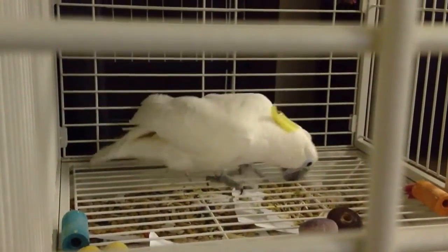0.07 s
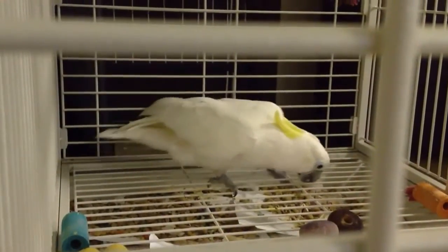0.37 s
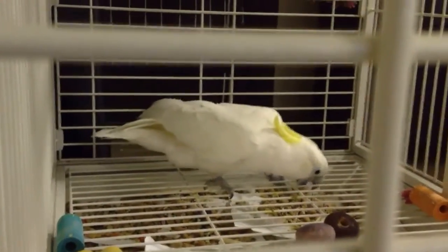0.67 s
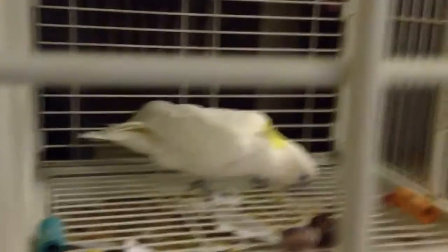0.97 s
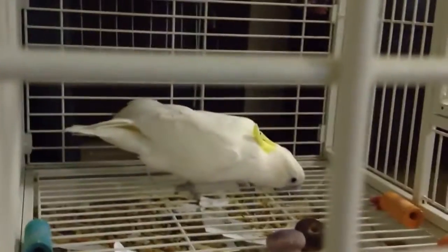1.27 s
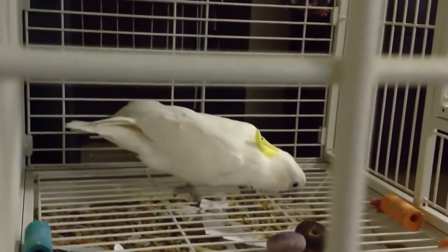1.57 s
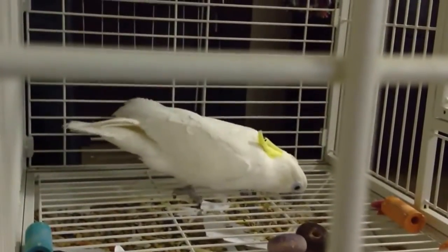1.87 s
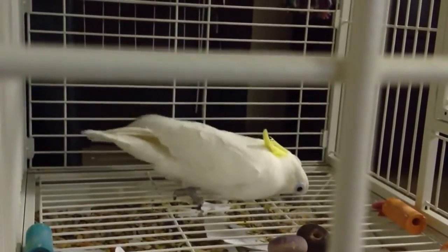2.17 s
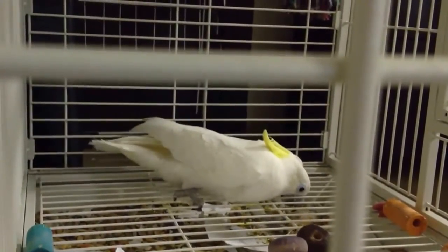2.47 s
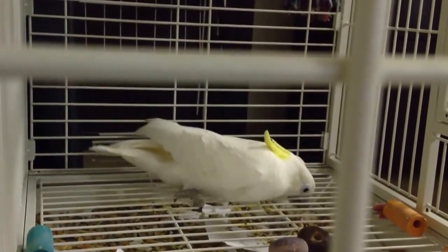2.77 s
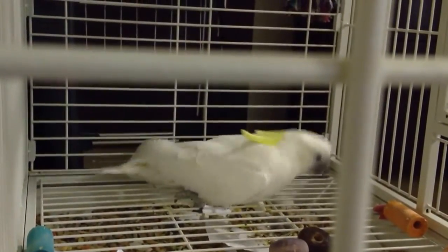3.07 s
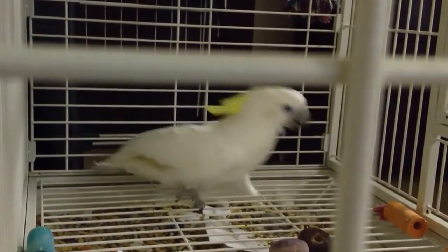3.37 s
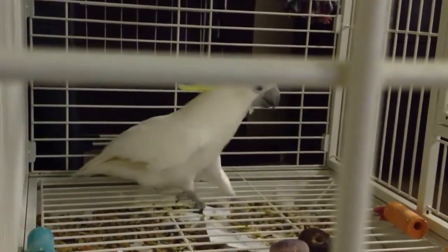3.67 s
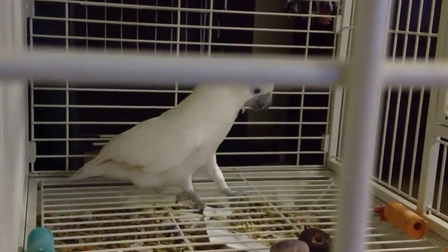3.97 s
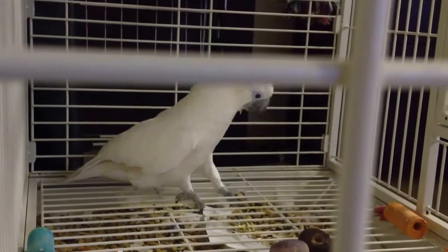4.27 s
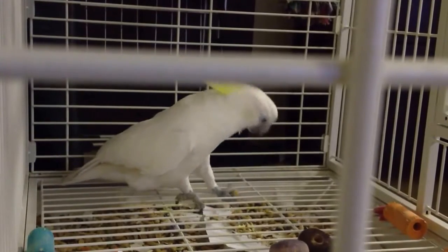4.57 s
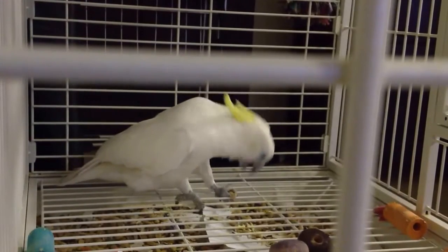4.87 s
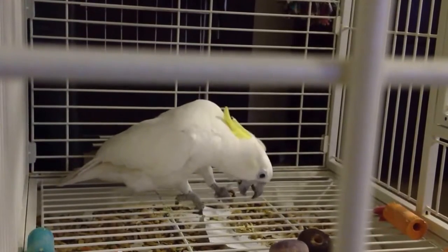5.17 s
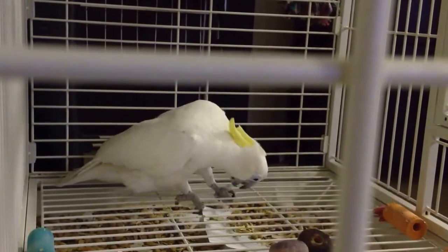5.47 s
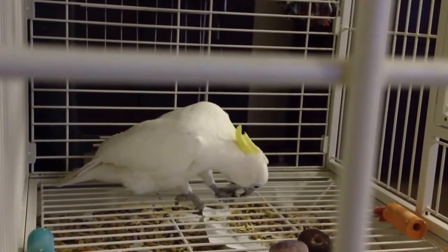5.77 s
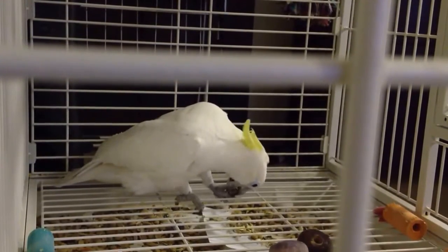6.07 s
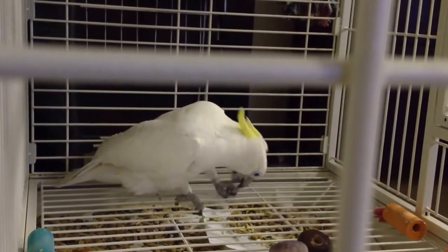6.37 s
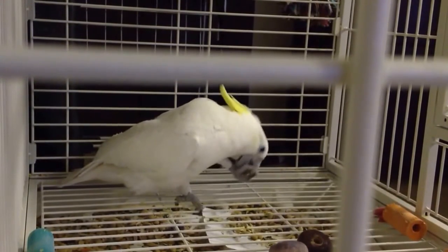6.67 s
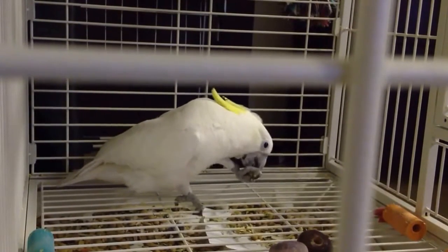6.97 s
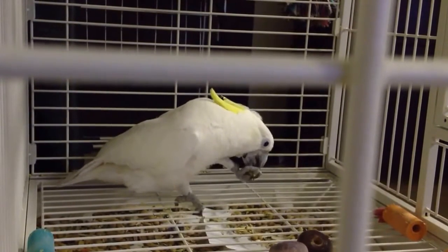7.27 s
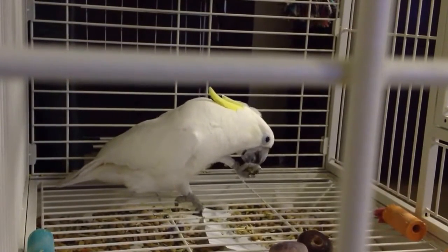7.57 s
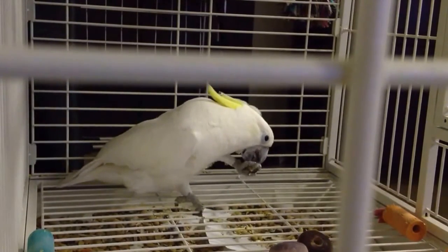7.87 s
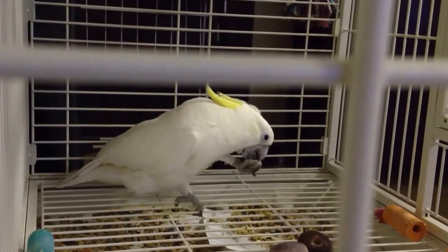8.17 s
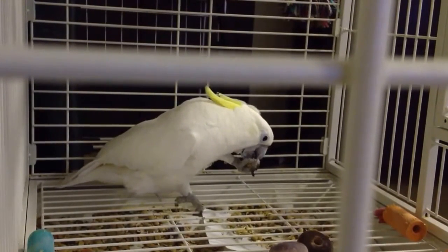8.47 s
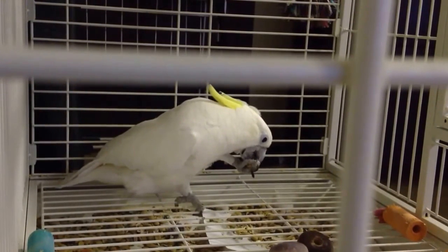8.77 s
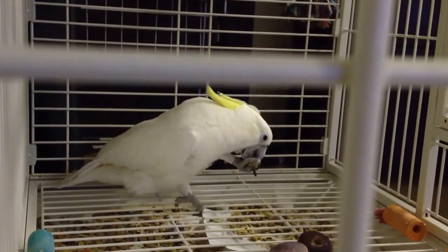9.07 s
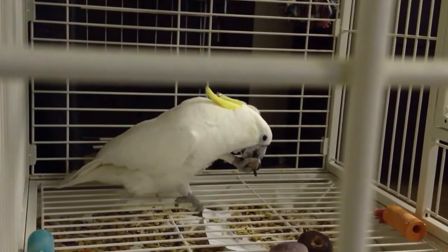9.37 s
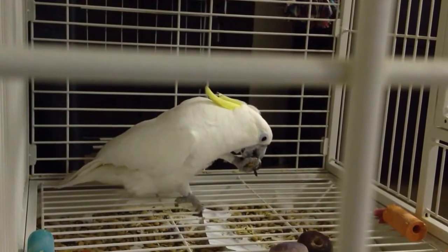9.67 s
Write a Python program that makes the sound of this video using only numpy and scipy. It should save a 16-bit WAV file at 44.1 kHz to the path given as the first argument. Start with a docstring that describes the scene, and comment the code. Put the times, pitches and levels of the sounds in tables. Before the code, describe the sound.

Scratching, tapping and a ringing metal clang as a parrot moves in its cage, followed by quiet nibbling clicks over room hum.

```python
"""Over a low room hum, a cockatoo's beak and claws scuff the wire floor of its cage.
Stick-slip friction scratches the grate; impacts set its wires ringing and knock the tray below.
The bird rears up with a swish of feathers, then cracks a morsel in sparse, dry clicks of brittle
fracture. A small, quiet room reflects these sounds; a faint, thin whistle comes and goes in it."""
import sys
import numpy as np
from scipy import signal
from scipy.fft import rfft, irfft, next_fast_len
from scipy.io import wavfile
from scipy.ndimage import uniform_filter1d

SR = 44100
rng = np.random.default_rng(int(sys.argv[2]) if len(sys.argv) > 2 else 0)


def transcribe(signal):
    """Save signal, clipped to [-1, 1], as a 16-bit WAV file at the path in sys.argv[1]."""
    frames = np.atleast_2d(signal).T
    limited = np.clip(frames, -1, 1)
    pcm = np.round(limited * 32767).astype(np.int16)
    wavfile.write(sys.argv[1], SR, pcm)


N = 432621
TIME = np.arange(N) / SR


def amp(db):
    """Amplitude ratio: tenfold for every 20 dB."""
    return 10 ** (np.asarray(db) / 20)


def unit_rms(x):
    """Power normalisation to an rms of 1."""
    return x / np.sqrt(np.mean(x ** 2) + 1e-30)


def unit_energy(x, ms):
    """Energy normalisation: a transient gets the energy of an rms of 1 lasting ms milliseconds."""
    return x * np.sqrt(ms * SR / 1000 / (np.sum(x ** 2) + 1e-30))


def curve(points, hz):
    """Interpolation of (f/Hz, value) points on a logarithmic frequency axis."""
    f, value = np.transpose(points)
    return np.interp(np.log(hz + 1), np.log(f + 1), value)


def add(mix, s, sound):
    """Superposition: a sound joins the mix at time s, which may be negative."""
    first = round(s * SR)
    sound = sound[..., max(-first, 0):]
    part = mix[..., max(first, 0):][..., :sound.shape[-1]]
    part += sound[..., :part.shape[-1]]


def colour(x, db_of, size=2048):
    """Minimum-phase filter: the phase follows from the log gain by the Hilbert transform."""
    hz = abs(np.fft.fftfreq(size, 1 / SR))
    log_gain = np.log(amp(np.maximum(db_of(hz), -90)))
    response = np.fft.ifft(np.exp(np.conj(signal.hilbert(log_gain)))).real[:size // 2]
    return signal.fftconvolve(x, response)[:len(x)]


def hump(hz, centre_hz, octaves, skirt_db=9):
    """Broad resonance, in dB: round on top, with straight skirts."""
    away = np.log2((hz + 1) / centre_hz) / octaves
    return -skirt_db * (np.sqrt(1 + away ** 2) - 1)


def peak(hz, centre_hz, width_hz):
    """Narrow resonance, in dB: Lorentzian amplitude of half-width width_hz."""
    return -20 * np.log10(1 + ((hz - centre_hz) / width_hz) ** 2)


def noise(db_of):
    """Stationary Gaussian noise of rms 1 with the given spectrum."""
    size = next_fast_len(N)
    spectrum = rfft(rng.standard_normal(size)) * amp(db_of(np.fft.rfftfreq(size, 1 / SR)))
    return unit_rms(irfft(spectrum, size)[:N])


def band(centre_hz, width_hz):
    """Narrow-band noise: a wavering tone, or a slow random drift when centred on 0 Hz."""
    return noise(lambda f: peak(f, centre_hz, width_hz))


def ringing(modes, hz, size):
    """Free vibration: damped modes at ratios to hz, over size samples, with an rms of 1."""
    t = np.arange(size) / SR
    return unit_rms(sum(amp(db - 60 * t / t60) * np.sin(2 * np.pi * hz * ratio * t)
                        for ratio, db, t60 in modes))


# spectrum of the room air: f/Hz, relative density/dB
AIR_SPECTRUM = [(15, -59), (25, -52), (43, -25.5), (75, -21.5), (104, -3.5), (126, -0.5), (152, -12),
                (183, -0.5), (240, -8), (297, -6), (495, -13.5), (762, -16), (1950, -25.5), (13500, -38),
                (15500, -33)]
# its slow drift: t/s, level/dB
AIR_LEVEL = [(0, -56), (1.5, -57), (3.5, -55), (5.6, -58), (9.8, -58.5)]
# drones in the room: f/Hz, half-width/Hz, level/dB
DRONES = [(110.5, 22, -70.5), (134.2, 14, -70.5), (182, 6, -65.5), (219, 8.7, -67), (5470, 50, -88.5)]
def room_hum():
    """Ambient noise: narrow-band drones stand on a broad, bass-heavy spectrum."""
    air = noise(lambda f: curve(AIR_SPECTRUM, f)) * amp(np.interp(TIME, *np.transpose(AIR_LEVEL)))
    return air + sum(amp(db) * band(hz, width_hz) for hz, width_hz, db in DRONES)


# course of a faint low tone: t/s, f/Hz, level/dB
TONE_GLIDE = [(0.6, 284, -68), (0.85, 289.3, -64.5), (1.15, 299, -63.5), (1.5, 289.3, -63.5),
              (1.801, 300.8, -60), (2.05, 313, -53), (2.26, 326, -59), (2.419, 307, -63), (2.9, 317.3, -66),
              (3.15, 313, -60), (3.58, 320, -85), (3.7, 310, -91)]
def low_tone(waver_rate_hz=6.2, waver_hz=2.29, waver_db=2.5):
    """Random frequency and amplitude modulation: a tone wavers as it climbs and sinks back."""
    s, hz, db = np.transpose(TONE_GLIDE)
    pitch_hz = np.interp(TIME, s, hz) + waver_hz * band(0, waver_rate_hz)
    level_db = np.interp(TIME, s, db) + waver_db * band(0, waver_rate_hz)
    return unit_rms(np.sin(2 * np.pi * np.cumsum(pitch_hz) / SR)) * amp(level_db)


def slips(size, per_s=3000, spread_db=1.0, rub=0.68):
    """Stick-slip friction: many tiny catches of uneven strength over a smooth rub."""
    strengths = amp(spread_db * np.minimum(rng.exponential(1, size), 3.5)) * rng.choice([-1, 1], size)
    catches = unit_rms(strengths * (rng.random(size) < per_s / SR))
    return unit_rms(catches + rub * rng.standard_normal(size))


def stroke(length_s, lead_s, rise_share=.44, spot_db=2.5):
    """Sliding contact under a pressure that peaks at lead_s: returns (pressure, slips)."""
    t = np.arange(SR // 2) / SR - lead_s
    pressure = np.exp(-np.maximum(-t / rise_share, t / (1 - rise_share)) / length_s)
    spectra = signal.stft(slips(len(t)), nperseg=256)[2]
    # each spot along the way favours its own resonances
    spots = uniform_filter1d(rng.standard_normal(spectra.shape), size=4, axis=0)
    spots = unit_rms(uniform_filter1d(spots, size=6, axis=1))
    return pressure, signal.istft(spectra * amp(spot_db * spots), nperseg=256)[1][:len(t)]


# response of the rattling tray: f/Hz, relative density/dB
TRAY_SPECTRUM = [(100, -38.5), (260, 0.5), (400, 1.5), (620, -0.5), (800, -3), (920, -1), (1100, 0),
                 (1350, -4), (1750, -5.5), (2200, -10), (3000, -13), (5000, -55.5), (15000, -63)]
# strokes of claw or beak: peak t/s, length/s, scratch level/dB, weight (rattle re scratch)/dB
SCUFF_STROKES = [(0.010, 0.038, -55.5, -4), (0.072, 0.056, -57, 1.5), (0.143, 0.04, -59.5, 7.5),
                 (0.907, 0.03, -43, -1.5), (0.945, 0.081, -46.5, -3.5), (1.041, 0.031, -41, -12),
                 (1.085, 0.077, -49, -7.5), (1.180, 0.03, -57.5, 7.5), (1.308, 0.016, -44.5, -3),
                 (1.463, 0.018, -40.5, 0), (1.541, 0.018, -39.5, -7.5), (1.635, 0.04, -56, -7),
                 (1.735, 0.028, -48.5, 1.5), (1.801, 0.018, -54, 5.5), (1.836, 0.033, -47, -2.5),
                 (1.945, 0.021, -45, -0.5), (2.050, 0.29, -46, -5), (2.212, 0.016, -42.5, -19),
                 (2.235, 0.051, -43.5, 1), (2.288, 0.034, -45, 2), (2.353, 0.044, -47, 1),
                 (2.388, 0.037, -44, 2), (2.416, 0.031, -41, 1), (2.515, 0.075, -44, -0.5),
                 (2.597, 0.04, -49, 7.5), (2.671, 0.073, -58.5, -4), (2.855, 0.052, -55.5, 7.5),
                 (3.110, 0.037, -61, -21), (3.385, 0.14, -51, 5), (3.394, 0.016, -44.5, 0),
                 (3.426, 0.02, -41.5, 4), (3.495, 0.13, -48, 0), (4.040, 0.032, -58, -2),
                 (5.030, 0.015, -48, 2.5)]
def scuffs(strokes, scratch_hz=4594, weight_db_per_octave=18, lead_s=.15):
    """Frictional excitation: the slips of each stroke scratch the wire and shake the tray."""
    out = np.zeros(N)
    for s, length_s, db, weight_db in strokes:
        pressure, catches = stroke(length_s, lead_s)
        hz = scratch_hz * 2 ** (-weight_db / weight_db_per_octave)  # heavier strokes scratch lower
        scratch = unit_rms(colour(catches, lambda f: hump(f, hz, octaves=1.0)))
        rattle = unit_rms(colour(catches, lambda f: curve(TRAY_SPECTRUM, f)))
        add(out, s - lead_s, amp(db) * pressure * (scratch + amp(weight_db) * rattle))
    return out


ZING_HZ, ZING_WIDTH_HZ = 11250, 700  # the grate's brightest cluster of modes
# dense, quickly dying modes of the grate: f/Hz, relative density/dB
GRATE_SPECTRUM = [(300, -34), (1600, -14), (2600, -18), (3500, -10), (4200, -4.5), (6000, -6), (7000, -9),
                  (9700, -7.5), (10700, -0.5), (11400, 5.5), (12300, -14), (13500, -10), (15500, -6)]
# its distinct modes; crossing wires ring in close, beating pairs: f/Hz, relative level/dB, T60/s
GRATE_MODES = [(3901, -15, .3), (4060, -23, .25), (3580, -21, .35), (4581, -16, .2), (4905, -21, .45),
               (5303, -22, .4), (5674, -15, .25), (5970, -12, .22), (6385, -15, .28), (10380, -11, .14),
               (10884, -6, .14), (10938, -5, .14), (11135, -6, .18), (11200, -6, .23), (11432, -3, .17),
               (11484, -6, .17), (11590, -7, .22), (11820, -12, .2), (12274, -15, .2), (12834, -15, .2),
               (14646, -16, .16), (15091, -19, .2)]
# blows on the wires: t/s, level/dB, tilt/(dB per octave), zing/dB, hold (factor on the distinct
# modes' T60 and amplitude), then the struck wire's own note: f/Hz, level/dB, T60/s
WIRE_BLOWS = [(0.046, -46.5, 0, -12, 0.88, 4120, -68, 0.45),
              (0.1520, -39.5, 1.5, -10, 0.59, 4195, -63, 0.95),
              (2.0360, -18, 2, -5.5, 0.93, 4200, -47, 0.7), (2.208, -46, -27, -9, 0.52, 3880, -57, 0.21),
              (3.1722, -41.5, -2.5, -11, 0.74, 3900, -53, 0.19),
              (3.9404, -53.5, -19, -9, 0.77, 3860, -68, 0.18),
              (4.031, -51.5, -11, -9, 0.93, 3940, -70, 0.22), (4.586, -54, -8, -10, 0.56, 3850, -71, .3),
              (4.64, -55.5, -7, -9, 0.8, 3900, -77, 0.37), (4.72, -61, -19, -6, .7, 3940, -75, 0.42)]
def grate_ring(dense_t60=0.23, modes_db=-7, build_s=0.00098, trim_db=-1):
    """Modal decay of a welded grate: dense modes die fast, a few sing on unless a foot damps them."""
    out, t = np.zeros(N), np.arange(SR) / SR
    for s, db, tilt_db, zing_db, hold, *_ in WIRE_BLOWS:
        def coupling_db(f):
            """The point of impact decides how strongly each mode is excited."""
            zing = np.exp(-((f - ZING_HZ) / ZING_WIDTH_HZ) ** 2)
            return tilt_db * np.log2(np.maximum(f, 3800) / 8000) + zing_db * zing
        burst = rng.standard_normal(len(t)) * amp(-60 * t / dense_t60)
        dense = colour(burst, lambda f: curve(GRATE_SPECTRUM, f) + coupling_db(f))
        modes = sum(amp(mode_db + coupling_db(hz) - 60 * t / (t60 * hold))
                    * np.sin(2 * np.pi * (hz * t + rng.random())) for hz, mode_db, t60 in GRATE_MODES)
        ring = (unit_rms(dense) + amp(modes_db) * hold * unit_rms(modes)) * (1 - np.exp(-t / build_s))
        add(out, s, amp(db + trim_db) * unit_energy(ring, ms=20))
    return out


# partials of one struck wire: frequency ratio, relative level/dB, T60 ratio
WIRE_PARTIALS = [(1, 0, 1), (1.0022, -3, 1), (0.991, -5, .6), (1.31, -6, .5), (1.5, 3, .55),
                 (1.977, -4, .6), (2.78, -7, .5)]
def wire_notes(shiver_db=4, shiver_width_hz=130, shiver_t60=0.24):
    """Beats: a struck wire swings in two planes of nearly equal pitch, with a noisy shiver around it."""
    out, t = np.zeros(N), np.arange(SR) / SR
    for s, _, tilt_db, _, _, hz, db, t60 in WIRE_BLOWS:
        phase = rng.random()
        note = sum(amp(mode_db + tilt_db * np.log2(ratio) - 60 * t / (t60 * share))
                   * np.sin(2 * np.pi * (hz * ratio * t + phase))
                   for ratio, mode_db, share in WIRE_PARTIALS)
        shiver = unit_rms(colour(rng.standard_normal(len(t)), lambda f: peak(f, hz, shiver_width_hz)))
        add(out, s, amp(db) * (note + shiver * amp(shiver_db - 60 * t / shiver_t60)))
    return out


# hollow, strongly damped modes of beak and morsel: nominal f/Hz, relative level/dB, T60/s
BEAK_MODES = [(720, 0, 0.0111), (1225, 0, 0.04), (1480, -7.5, 0.013), (2000, 2, 0.019),
              (2500, -1.5, 0.01204), (3030, 0.5, 0.013)]
def click(db, hz, octaves, hollow_db=-11, hollow_limit=0.21, snap_s=0.00042, shell_s=0.00286):
    """Impact radiation: a snap, a shiver of husk or claw and a hollow knock, as (direct, wallward)."""
    t = np.arange(1024) / SR
    envelope = np.exp(-t / snap_s) + amp(-8) * np.exp(-t / shell_s)
    # the time of contact limits the treble above the centre
    rolloff_db = lambda f: 6.0 * np.log2(np.maximum(f / hz, 1))
    burst = envelope * rng.choice([-1., 1.], len(t))
    snap = colour(burst, lambda f: hump(f, hz, octaves) - rolloff_db(f))
    # summed over all directions, the snap is smoother and duller
    impulse = signal.unit_impulse(len(t)) * rng.choice([-1., 1.])
    diffuse = colour(impulse, lambda f: hump(f, hz * 0.92, octaves=1.41) - rolloff_db(f))
    body = sum(amp(mode_db - 60 * t / t60) * np.sin(2 * np.pi * f * rng.uniform(0.724, 1.15) * t)
               for f, mode_db, t60 in BEAK_MODES)
    hollow = amp(hollow_db) * (5000 / hz) ** 1.5  # duller blows knock the hollow modes harder
    knock = min(hollow, hollow_limit) * unit_energy(body, ms=1)
    direct = unit_energy(snap, ms=1) + knock
    wallward = unit_energy(diffuse, ms=1) + amp(7) * knock  # the knock radiates mostly aside
    return amp(db) * np.array([direct, wallward])


def flurry(length_s, db, fade_db, hz, octaves, count):
    """Decaying impulse train: clicks thin out and weaken over length_s, as (direct, wallward)."""
    out = np.zeros((2, SR // 6))
    for age in (np.arange(count) + rng.uniform(.3, 1, count)) / count:
        add(out, length_s * age ** 2, click(db + fade_db * age, hz, octaves))
    return out


def wire_chatter(length_s=0.058, relative_db=-14.5):
    """Intermittent contact: a struck wire buzzes against its neighbour."""
    out = np.zeros((2, N))
    for s, db, _, zing_db, *_ in WIRE_BLOWS:
        buzz = flurry(length_s, db + zing_db + relative_db, fade_db=-14, hz=ZING_HZ, octaves=.3, count=4)
        add(out, s, buzz)
    return out


# hollow, woody ring of a knock: frequency ratio, relative level/dB, T60/s
KNOCK_MODES = [(1, 0, .085), (1.07, -5.5, 0.054), (1.55, -8, 0.063)]
# dull knocks of beak and feet: t/s, level/dB, f/Hz, ring re thud/dB
KNOCK_BLOWS = [(0.1530, -49, 695, -2), (0.7894, -42.5, 470, -14), (0.9038, -40, 497, -20),
               (0.9065, -43, 794, -7), (1.1890, -42.5, 467, -3), (1.308, -45, 1243, 1),
               (1.4575, -43, 1125, 14), (1.4668, -39.5, 1117, 3), (1.5390, -42.5, 1330, -2),
               (1.735, -52, 1250, 1.5), (1.836, -48, 1220, 5), (2.2230, -30.5, 583, -29),
               (2.246, -47, 515, -19), (2.334, -43, 520, -8), (2.351, -46, 557, -10), (2.400, -39, 604, -3),
               (2.412, -41, 1600, -3), (2.429, -43, 580, -8), (3.109, -46.5, 446, -17),
               (3.422, -43, 515, 0), (3.4247, -42.5, 1240, -2), (5.0195, -47, 1410, -14),
               (7.0410, -59, 1410, -7), (9.409, -64, 800, -10)]
def knocks(t60_cycles=9.6, build_s=.001, rattle_db=-3, rattle_t60=0.055):
    """Damped oscillation: a blunt blow gives a thud, a hollow ring and a short rattle of the tray."""
    out, t = np.zeros(N), np.arange(8192) / SR
    for s, db, hz, ring_db in KNOCK_BLOWS:
        envelope = amp(-60 * t * hz / t60_cycles) * (1 - np.exp(-t / build_s))
        thud = unit_rms(np.sin(2 * np.pi * hz * t) * envelope)
        ring = amp(ring_db) * ringing(KNOCK_MODES, hz, size=len(t))
        burst = rng.standard_normal(len(t)) * amp(-60 * t / rattle_t60)
        rattle = amp(rattle_db) * unit_rms(colour(burst, lambda f: hump(f, hz, octaves=0.86)))
        add(out, s, amp(db) * unit_energy(thud + ring + rattle, ms=5))
    return out


# sharp taps on the grate: t/s, level/dB, centre f/Hz, spread/octaves, bounce re tap/dB
GRATE_TAPS = [(0.784, -45, 8460, 0.83, 1), (0.9038, -32, 7200, 0.43, -14), (0.9098, -23, 11300, 0.6, -3.5),
              (1.0346, -31, 6460, 0.23, -10), (1.1503, -37, 9200, 1, -14), (1.3103, -32, 8400, 0.63, -16),
              (1.3475, -47, 8200, 0.34, -11), (1.4571, -35, 4700, 0.23, -2.5),
              (1.5402, -38.5, 5230, 0.6, -3), (1.6700, -40.5, 9350, 1, -19),
              (1.8432, -41.5, 9000, 0.61, -3), (1.976, -41, 9500, .65, -10), (2.338, -43, 7500, 0.44, -14),
              (2.3515, -34, 4360, 0.88, -5), (3.4205, -34, 2870, 0.4, -7), (3.7169, -46, 8950, 0.91, -15),
              (3.9835, -54.5, 12500, 0.8, -8), (4.0214, -43.5, 12000, 0.65, -12),
              (4.1592, -45, 12000, .45, -6), (4.1636, -40, 5660, 0.41, -17), (4.2290, -52, 6500, .8, 2)]
def taps(bounce_s=0.0056):
    """Elastic rebound: beak or claw strikes the grate and bounces once."""
    out = np.zeros((2, N))
    for s, db, hz, octaves, bounce_db in GRATE_TAPS:
        add(out, s, click(db, hz, octaves))
        add(out, s + bounce_s, click(db + bounce_db, hz, octaves))
    return out


def shuffles(from_s=1.5, to_s=3.7, per_s=11, length_s=0.051, db=-63, weight_db=4.5):
    """Light friction at loose intervals: the feet shift while the bird forages."""
    count = round(per_s * (to_s - from_s))
    return scuffs([(from_s + (k + rng.random()) / per_s, length_s, db, weight_db) for k in range(count)])


# swishes as the bird rears up: peak t/s, length/s, level/dB, centre f/Hz, spread/octaves
FEATHER_STROKES = [(3.505, 0.13, -43, 7300, 1.2), (3.524, 0.066, -40.5, 6650, 0.25),
                   (3.6, 0.031, -42.5, 6250, 0.37)]
def feathers(lead_s=0.15):
    """Friction noise: feathers brush the wires, too lightly to shake the tray."""
    out = np.zeros(N)
    for s, length_s, db, hz, octaves in FEATHER_STROKES:
        pressure, catches = stroke(length_s, lead_s)
        swish = unit_rms(colour(catches, lambda f: hump(f, hz, octaves)))
        add(out, s - lead_s, amp(db) * pressure * swish)
    return out


# brief ring of the breaking husk: frequency ratio, relative level/dB, T60/s
HUSK_MODES = [(1, 1, 0.0076), (1.16, -3, .007), (1.8, -14, .006)]
# echoes from the nearest walls: delay t/s, gain/dB
EARLY_ECHOES = [(0.0125, -14.5), (0.0189, -12), (.028, -13)]
# woody colour of a crack's reverberation: f/Hz, gain/dB
CRACK_ROOM_TINT = [(200, -0.5), (1400, -0.5), (2200, 3), (3200, 3.5), (6000, -1), (9000, -2), (15000, 1)]
# path from the raised beak to the listener: f/Hz, gain/dB
BEAK_PATH = [(100, 3), (400, 0), (1500, -2.5), (2800, 2), (4000, -2), (5400, -2.5), (7200, -1),
             (8700, -2.5), (9900, -7.5), (11500, 1), (13500, 2), (15500, -6)]
# bites: t/s, level/dB, centre f/Hz, spread/octaves, splintering time/s, husk ring/dB, beak hollow/dB
BITES = [(5.0133, -40, 5800, 1.2, 0.0036, -8, -16), (5.0162, -35.5, 6700, 0.97, 0.0016, 2.5, -12),
         (5.0204, -35, 6500, 1.3, 0.0031, -5, -9.5), (5.0882, -40, 7500, .9, 0.008, -11, -11),
         (5.1246, -44.5, 5040, 0.7, .003, 6.5, -22), (5.1573, -46, 8500, 0.87, 0.0025, -15, -18),
         (5.1600, -42.5, 6700, 0.65, 0.0047, -6, -18), (5.167, -43, 6660, 0.56, 0.016, -6, -16),
         (6.203, -41.5, 6930, 1.5, 0.0033, -6, -7), (6.213, -49, 7750, 1, 0.0043, -2, -4),
         (6.2356, -52, 8000, 1.1, 0.0027, -3, -4), (6.254, -53.5, 6000, 1, 0.0085, -6, -11),
         (6.333, -54, 7500, 0.81, 0.0081, -8, -12), (6.432, -50, 8150, 1.6, 0.02, -15, -10),
         (6.5280, -57, 8500, 1.5, 0.0058, -4, -5), (7.0406, -42.5, 7200, 1.6, 0.0079, -1, -12),
         (7.0403, -48, 13050, .5, .006, -15, -11), (7.592, -56, 6100, 0.42, 0.0046, -3.5, -14),
         (7.8, -56, 6950, 0.88, .005, -7, -11), (8.1512, -52, 5970, 0.87, 0.0081, -10, -11),
         (8.2520, -38, 6070, 1.3, 0.0018, 1, -9), (8.2560, -39.5, 7300, 0.64, 0.0027, 2, -8),
         (8.3115, -59, 6200, 1.1, 0.0022, -5, -13), (9.407, -47.5, 7140, 1.3, 0.008, -10, -12),
         (9.4100, -46.5, 4600, 1.46, 0.0066, -1, -13), (9.537, -56.5, 5300, .5, 0.0023, -6, -13.5),
         (9.597, -47, 6070, 1.2, 0.008, -2, -14)]
def cracks(splinter_db=-4.5, crumble_s=.04, crumble_db=-18, room_db=-4.0):
    """Brittle fracture: each bite snaps the husk, which rings briefly, splinters and crumbles."""
    out = np.zeros(N)
    for s, db, hz, octaves, splinter_s, husk_db, beak_db in BITES:
        bite = flurry(splinter_s, db + splinter_db, fade_db=-5.5, hz=hz, octaves=octaves, count=3)
        add(bite, 0, click(db, hz, octaves, hollow_db=beak_db, hollow_limit=.6))
        direct, wallward = bite
        crumbs, _ = flurry(crumble_s, db + crumble_db, fade_db=-11, hz=hz, octaves=octaves, count=4)
        add(out, s, direct + crumbs)
        add(out, s, amp(db + husk_db) * unit_energy(ringing(HUSK_MODES, hz, size=1024), ms=1))
        # the head moves, so each bite meets a new set of reflections
        add(out, s, amp(room_db) * reverberation(wallward, CRACK_ROOM_TINT))
        for delay_s, echo_db in EARLY_ECHOES:
            add(out, s + delay_s, amp(echo_db) * wallward)
    return colour(out, lambda f: curve(BEAK_PATH, f))


def whistle(hz=10960, width_hz=70, peak_s=6.7, swell_s=0.55, db=-80.5, flicker_db=4, flicker_hz=12):
    """Amplitude-modulated narrow-band noise: a thin whistle swells, flickers and fades."""
    swell = np.exp(-((TIME - peak_s) / swell_s) ** 2)
    return band(hz, width_hz) * swell * amp(db + flicker_db * band(0, flicker_hz))


def nibbles(start_s=8.7, per_s=5, softest_db=-67, range_db=6, centre_hz=5500, snap_s=0.00029):
    """Small-scale fracture: crumbs give way in the beak at random, barely above the room."""
    out, t = np.zeros(N), np.arange(512) / SR
    span_s = N / SR - start_s
    for place, strength in rng.random((round(per_s * span_s), 2)):
        burst = np.exp(-t / snap_s) * rng.standard_normal(len(t))
        tick = colour(burst, lambda f: hump(f, centre_hz, octaves=0.92))
        add(out, start_s + place * span_s, amp(softest_db + range_db * strength) * unit_energy(tick, ms=1))
    return out


# reverberation time of the room: f/Hz, T60/s
ROOM_DECAY = [(200, 0.58), (800, 0.3), (2100, 0.32), (5500, 0.41), (14700, 0.31)]
def reverberation(x, tint, first_s=0.0031, density=.2):
    """Diffuse field: dense reflections from cage and walls, each band decaying at its own rate."""
    size = SR // 2
    reflections = rng.choice([-1., 1.], size) * (rng.random(size) < density)
    reflections *= np.arange(size) > first_s * SR
    hz, t, spectra = signal.stft(reflections, SR, nperseg=256)
    decay = amp(-60 * t / curve(ROOM_DECAY, hz)[:, None])
    tail = signal.istft(spectra * decay, SR, nperseg=256)[1]
    response = colour(tail / np.linalg.norm(tail), lambda f: curve(tint, f))
    return signal.fftconvolve(x, response)[:N]


# path from the cage floor to the listener: f/Hz, gain/dB
FLOOR_PATH = [(100, -6), (300, -0.5), (1800, 0), (2300, -2), (2900, -0.5), (4000, 0), (5300, -1.5),
              (6700, -0.5), (8200, -1.5), (9400, -5.5), (10300, -1.5), (11700, 5), (13800, 3),
              (15500, -6.5)]
def scene(click_room_db=-5.0, feet_room_db=-6, grate_room_db=-11, bass_cut_hz=55):
    """Superposition of the bird's direct sound, its reverberation and the ambient noise."""
    ambience = room_hum() + low_tone() + whistle()
    grate = grate_ring()
    clicks, clicks_wallward = taps() + wire_chatter() + nibbles()
    movement = knocks() + scuffs(SCUFF_STROKES) + feathers() + shuffles()
    direct = clicks + movement + grate + wire_notes()
    wallward = (amp(click_room_db) * clicks_wallward + amp(feet_room_db) * movement
                + amp(grate_room_db) * grate)
    room_tint = ((200, 0), (2500, 2), (6000, 0), (9000, -1), (15000, 0))  # f/Hz, gain/dB
    cage = direct + reverberation(wallward, room_tint)
    bird = colour(cage, lambda f: curve(FLOOR_PATH, f)) + cracks()
    # a light cage radiates no deep bass
    bass_cut = signal.butter(2, bass_cut_hz, "high", fs=SR, output="sos")
    return (signal.sosfilt(bass_cut, bird) + ambience)[None]


def record(dry, edge_hz=15400):
    """Band limiting: a steep linear-phase low-pass removes the highest treble."""
    low_pass = signal.firwin(511, edge_hz, window=("kaiser", 9), fs=SR)
    return signal.oaconvolve(dry, low_pass[None], "same")


dry = scene()
out = record(dry)
transcribe(out)
```